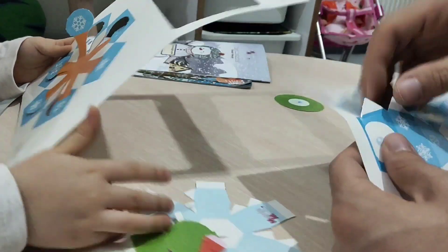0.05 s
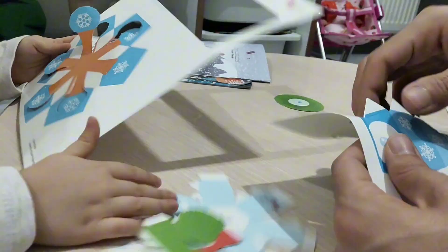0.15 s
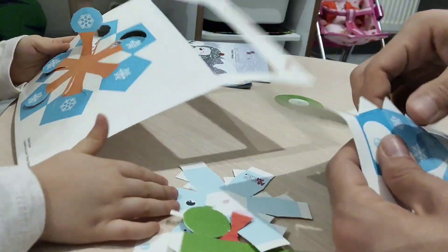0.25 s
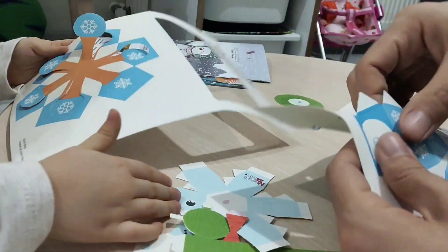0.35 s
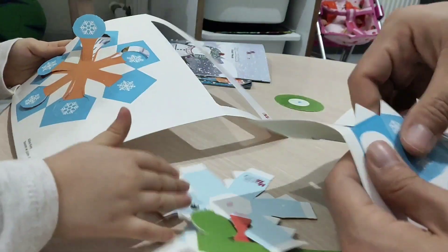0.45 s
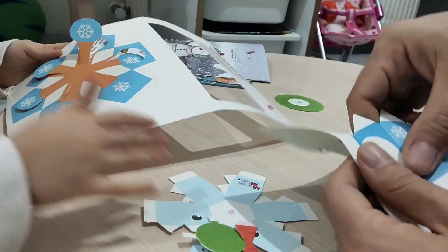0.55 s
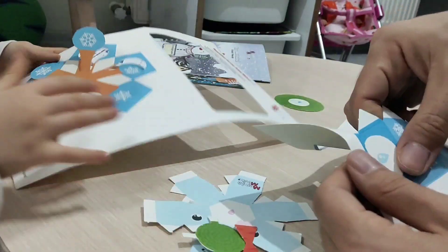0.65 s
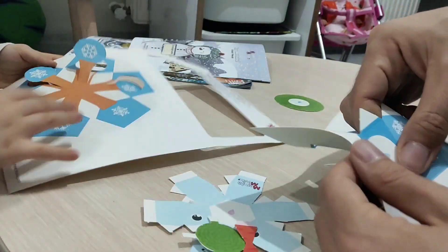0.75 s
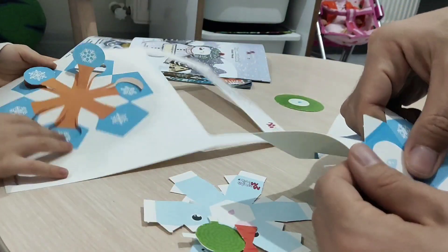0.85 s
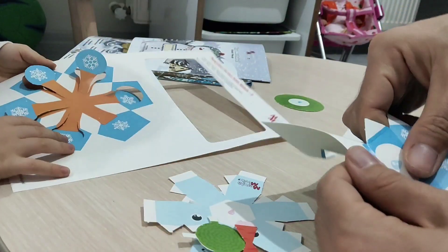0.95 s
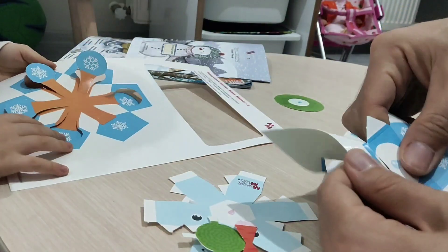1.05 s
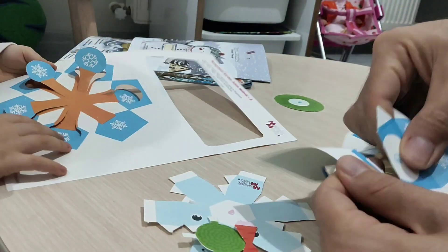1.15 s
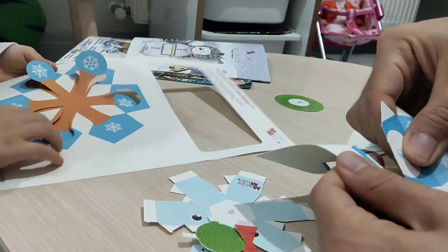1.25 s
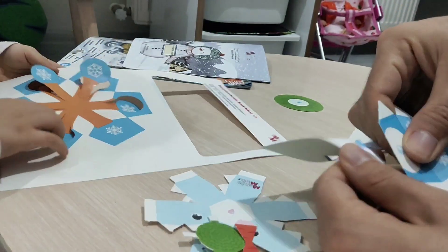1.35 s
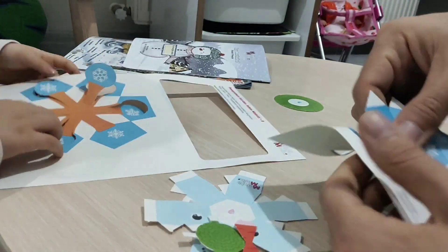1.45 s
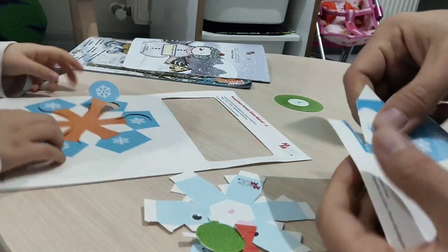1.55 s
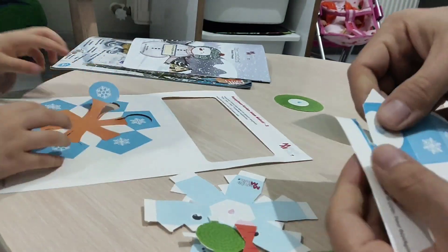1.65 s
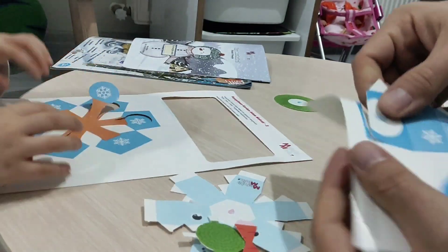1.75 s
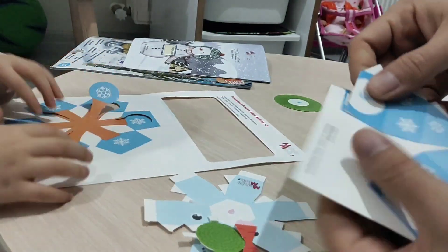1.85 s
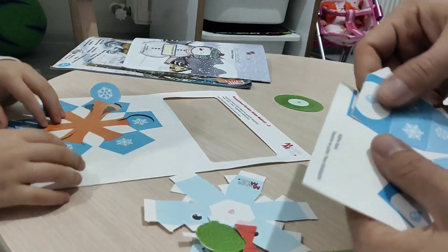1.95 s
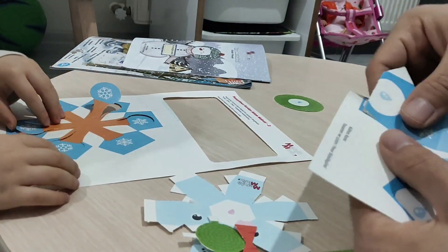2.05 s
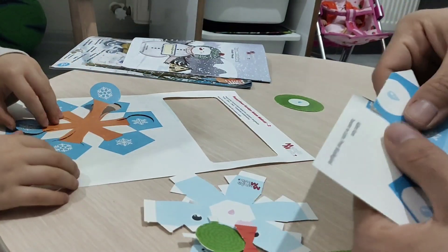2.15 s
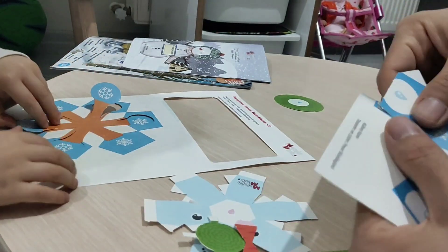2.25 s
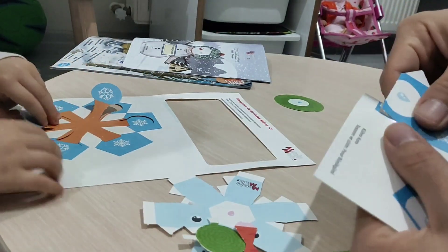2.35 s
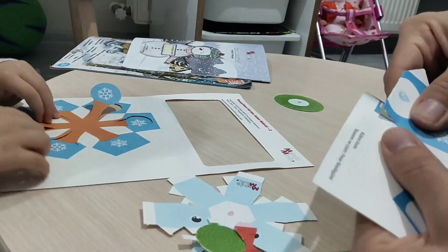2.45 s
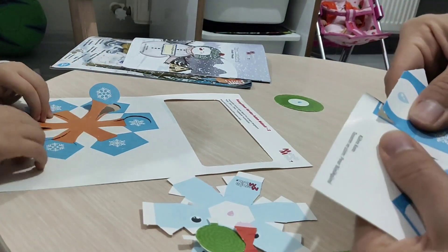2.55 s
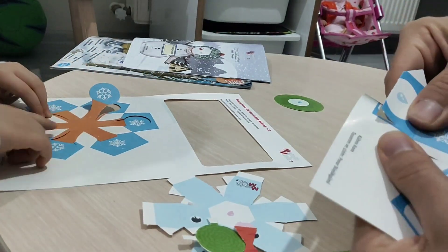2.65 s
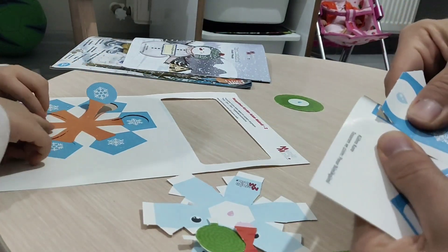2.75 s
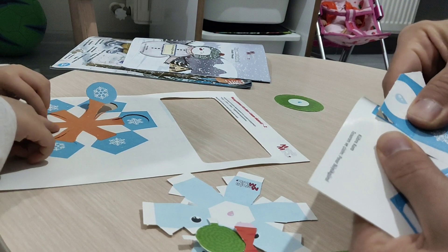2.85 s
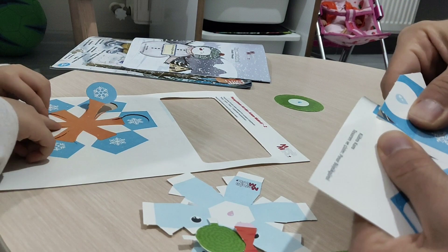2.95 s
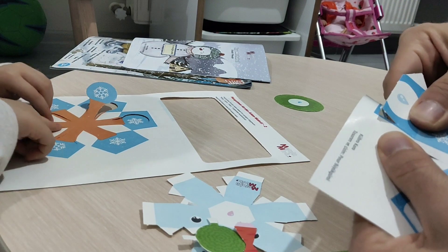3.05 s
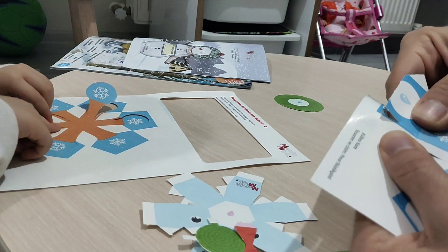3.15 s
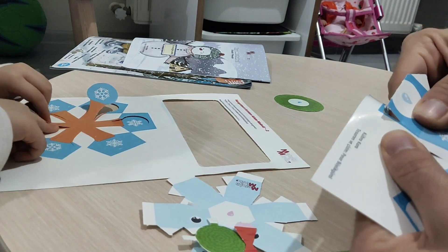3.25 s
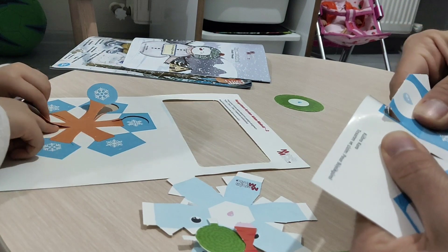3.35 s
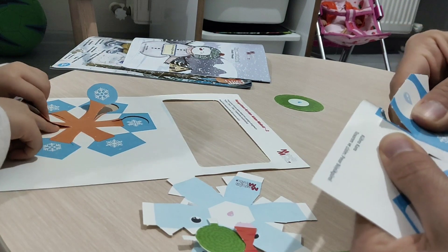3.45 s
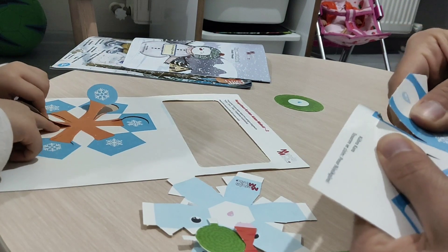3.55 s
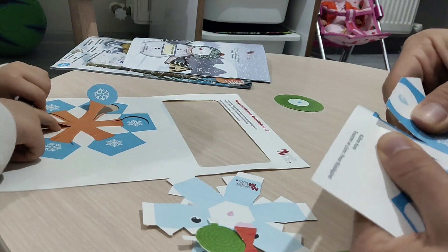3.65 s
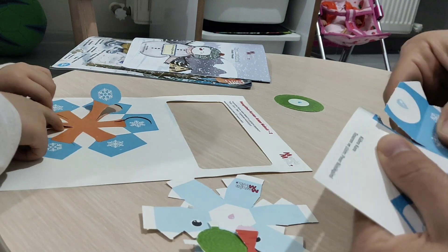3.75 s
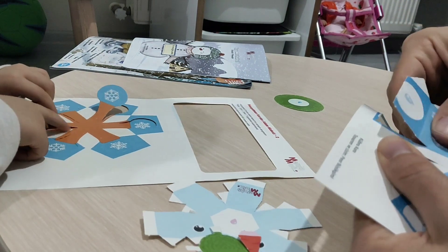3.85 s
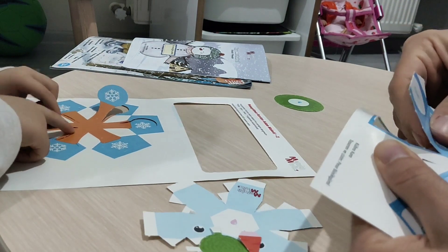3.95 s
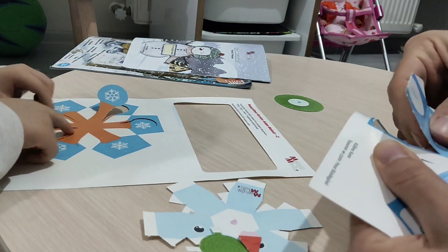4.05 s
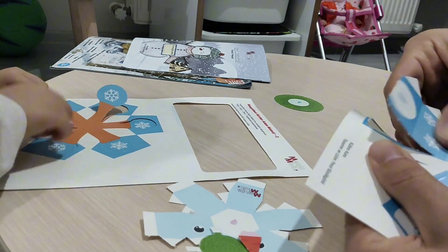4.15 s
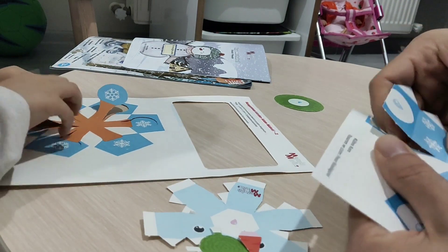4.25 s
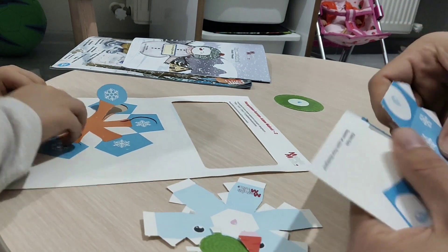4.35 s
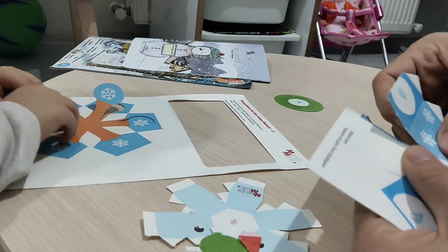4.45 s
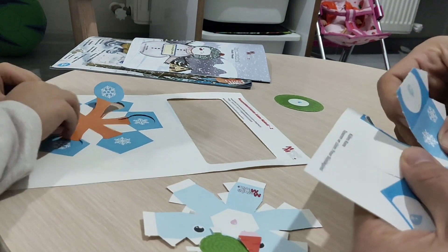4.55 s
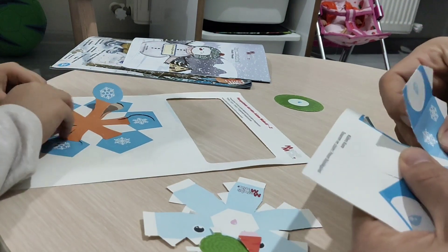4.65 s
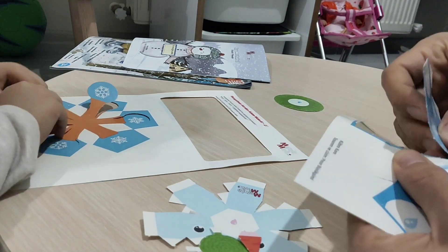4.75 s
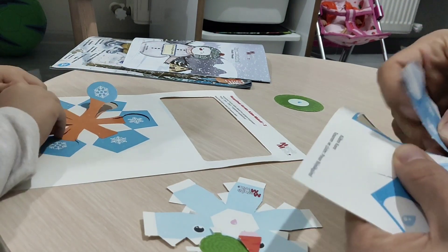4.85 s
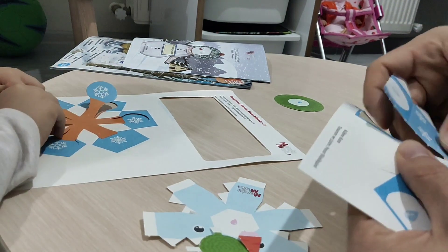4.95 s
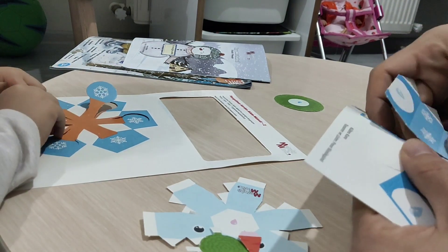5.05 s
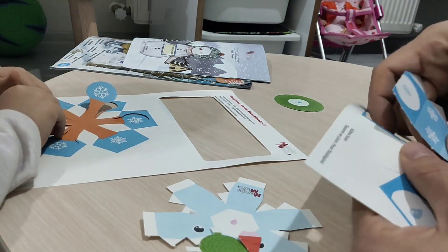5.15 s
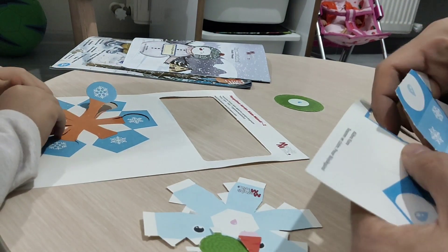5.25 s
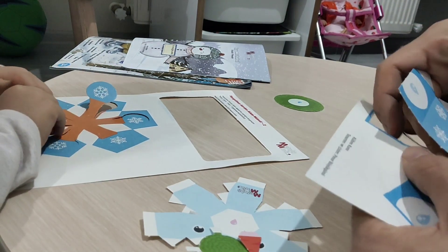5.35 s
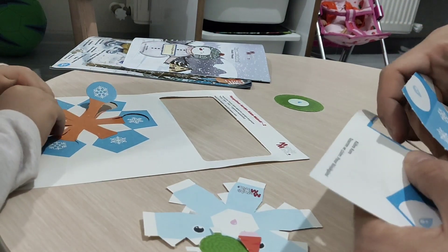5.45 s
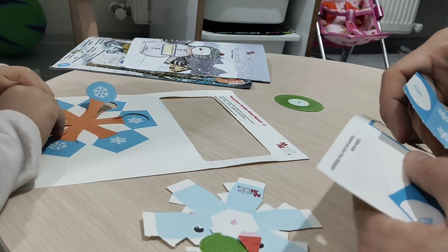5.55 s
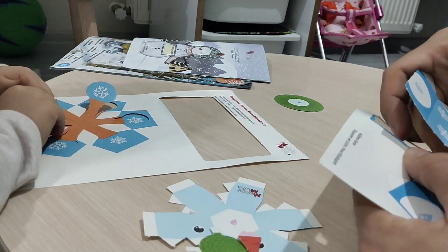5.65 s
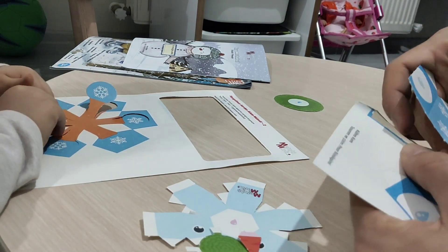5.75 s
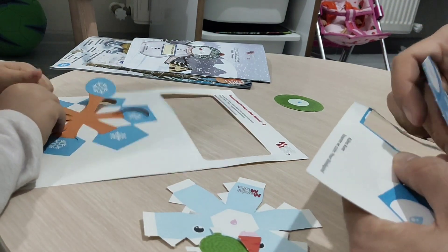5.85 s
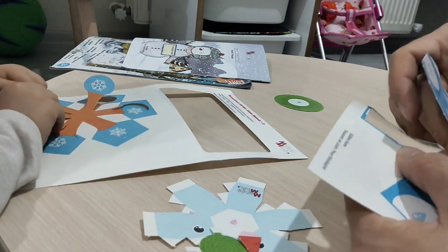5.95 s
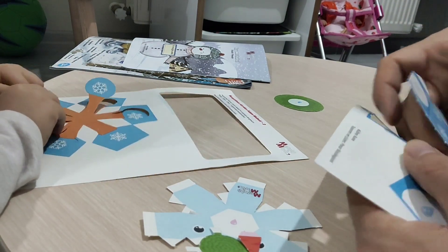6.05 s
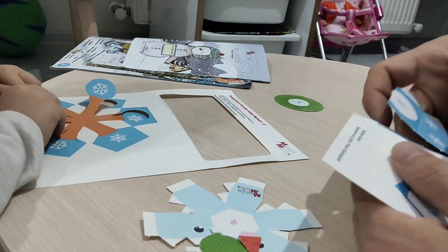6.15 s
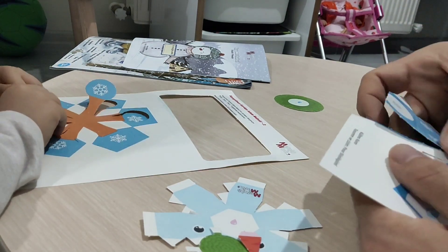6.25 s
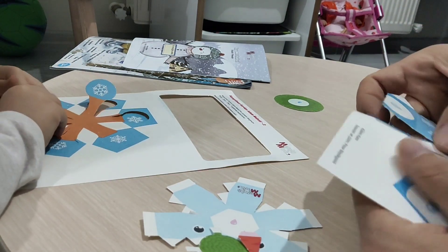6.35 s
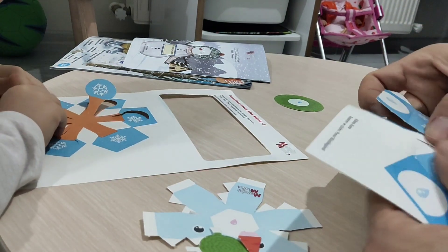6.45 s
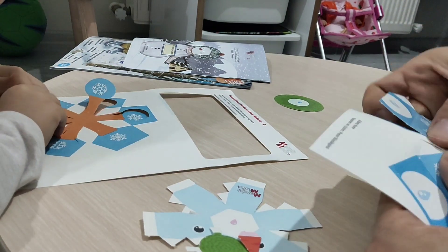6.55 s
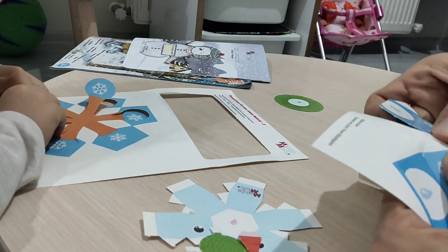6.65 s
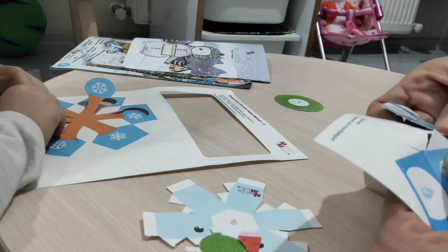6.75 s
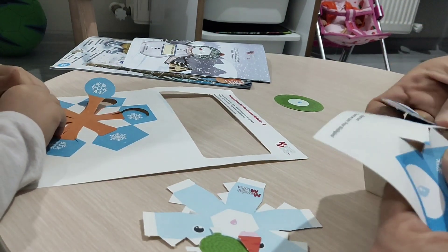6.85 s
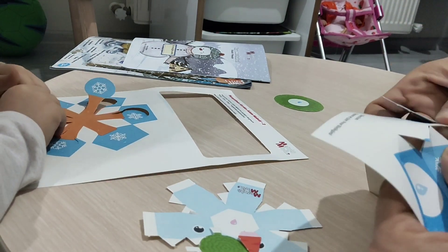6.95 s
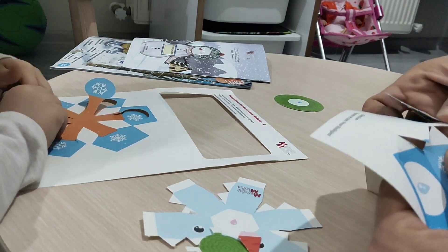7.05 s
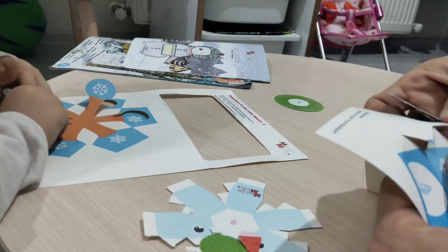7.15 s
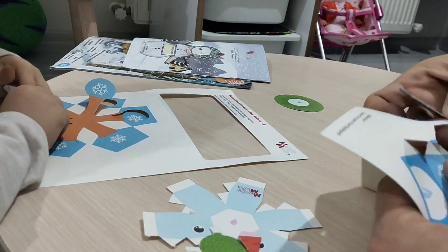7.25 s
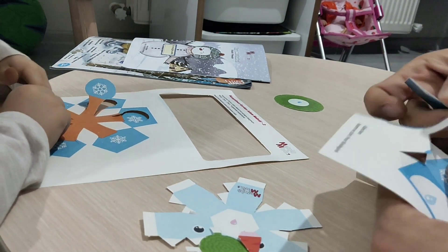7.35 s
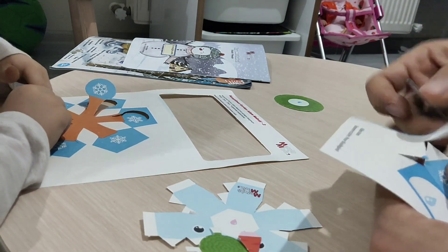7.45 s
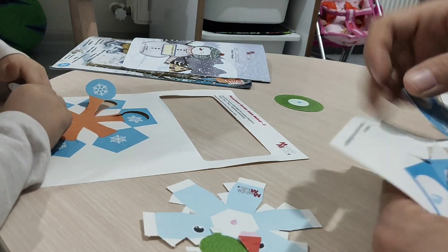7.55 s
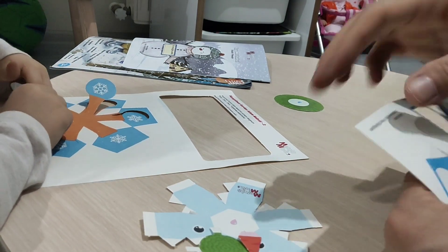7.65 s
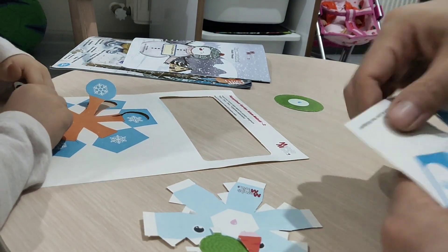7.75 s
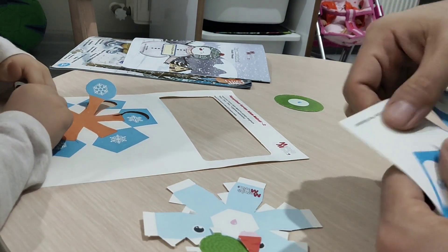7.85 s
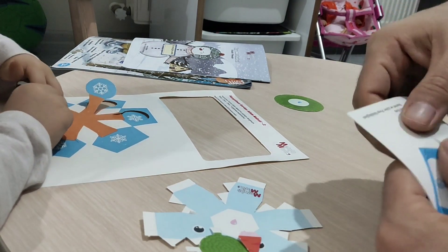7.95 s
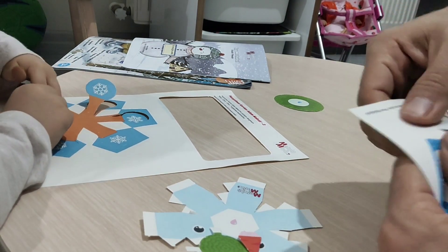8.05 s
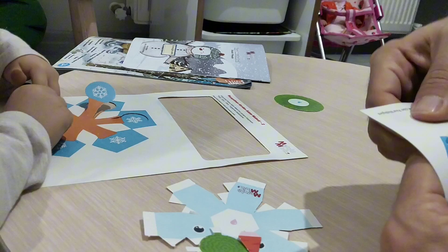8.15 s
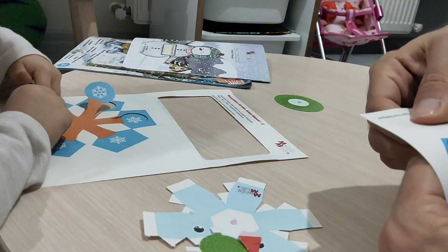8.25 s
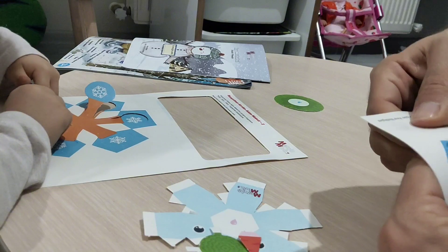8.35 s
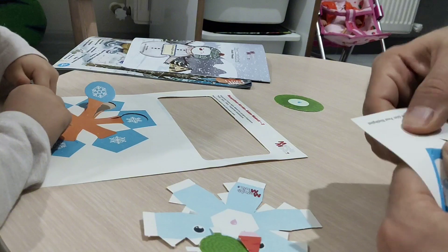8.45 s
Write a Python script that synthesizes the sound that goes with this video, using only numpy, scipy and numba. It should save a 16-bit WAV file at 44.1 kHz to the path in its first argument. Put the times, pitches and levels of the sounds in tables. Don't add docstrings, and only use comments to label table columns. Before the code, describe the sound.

Stiff paper handling at a table, recorded close in stereo. Card flexes and crinkles in short bursts, faces slide with a dry hiss, corners flick and creases tick. Bridges between die-cut pieces break with hard, woody pops, irregularly spaced, some near full level. There are low hand knocks, fine scrapes and one tiny finger squeak, with a brief indoor echo and an almost silent background.

```python
import sys
import numpy as np
from scipy import signal
from scipy.fft import rfft, irfft
from scipy.io import wavfile
from numba import njit

SR = 44100
rng = np.random.default_rng(int(sys.argv[2]) if len(sys.argv) > 2 else 0)


def to_wav(s):
    ch = np.atleast_2d(s).T
    pcm = np.round(np.clip(ch, -1, 1) * 32767)
    wavfile.write(sys.argv[1], SR, pcm.astype(np.int16))


def volts_from_decibels(level):
    exponent = np.asarray(level, float) / 20
    return 10 ** exponent


N = 374409


def unit(x):
    return x / np.sqrt(np.mean(x ** 2, axis=-1, keepdims=True))


def colour(x, curve):
    hz, db = np.transpose(curve)
    f = np.fft.rfftfreq(x.shape[-1], 1 / SR) + 1
    return unit(irfft(rfft(x) * volts_from_decibels(np.interp(np.log(f), np.log(hz), db)), x.shape[-1]))


def ring(x, hz, width):
    return signal.lfilter(*signal.iirpeak(hz, hz / width, fs=SR), x)


def band(x, lo_hz, hi_hz):
    return signal.sosfilt(signal.butter(2, [lo_hz, hi_hz], "bandpass", fs=SR, output="sos"), x)


@njit
def glide(x, hz, sharp):
    y, b, l = np.empty(len(x)), 0., 0.
    for i in range(len(x)):
        g = np.tan(np.pi * hz[i] / SR)
        v = (b + g * (x[i] - l)) / (1 + g * (g + 1 / sharp))
        b, l, y[i] = 2 * v - b, l + 2 * g * v, v / sharp
    return y


def hump(f, hz, sharp):
    return 1 / (1 + (sharp * (f / hz - hz / f)) ** 2)


def causal(power):
    cep = irfft(np.log(power) / 2)
    half = len(cep) // 2
    cep[1:half] *= 2
    cep[half + 1:] = 0
    return np.exp(rfft(cep))


def crackles(rate, scatter_db, tail_ms):
    sizes = volts_from_decibels(scatter_db * np.minimum(rng.exponential(size=N), 4.5))
    clicks = (rng.random(N) < rate / SR) * sizes
    fade = np.exp(-1000 / (tail_ms * SR))
    return unit(signal.lfilter([1], [1, -fade], clicks))


def place(x, pan_db, apart, lag=5):
    near, other = x
    right = np.roll(np.sqrt(1 - apart) * near + np.sqrt(apart) * other, lag)
    return np.array([near * volts_from_decibels(pan_db / 2), right * volts_from_decibels(-pan_db / 2)])


def room_air():
    # frequency in Hz, level in dB per Hz.
    air_curve = [(18, -46.5), (30, -20), (70, -9.5), (185, -10.5), (267, -10), (448, -15.5), (794, -16),
                 (859, -19), (1340, -19.5), (2630, -22.5), (6040, -27.5), (12200, -34), (13900, -25.5),
                 (15000, -47.5)]
    return place(colour(rng.standard_normal((2, N)), air_curve), 2.5, 0.992) * volts_from_decibels(-63)


def moves():
    # letting go in seconds, length in seconds, flexing in dB, sliding in dB re flexing.
    pulls = [(0.074, 0.089, -50, -4.5), (0.327, 0.15, -44.5, -4.5), (0.515, 0.13, -49.5, -3.5),
             (0.706, 0.076, -45, -5), (0.989, 0.045, -49, -5.5), (1.148, 0.11, -47.5, -10.5),
             (1.375, 0.12, -43, -22), (1.612, 0.2, -46, -4), (3.287, 0.15, -61, -7.5),
             (3.491, 0.032, -55, -9.5), (4.009, 0.065, -47, -1), (4.166, 0.078, -46.5, -8),
             (4.925, 0.12, -53, -0.5), (5.215, 0.125, -48.5, -1.5), (5.615, 0.052, -41.5, -9),
             (5.755, 0.0377, -44.5, -13.5), (6.107, 0.075, -47, -11), (7.39, 0.13, -40.5, -10),
             (7.535, 0.05996, -44.5, -5), (7.605, 0.037, -36.5, -6.5), (7.958, 0.05, -44, 0.5),
             (8.166, 0.048, -57, -8.5), (8.477, 0.045, -67, 3)]
    # start in seconds, length in seconds, flexing in dB, sliding in dB re flexing.
    slides = [(0.223, 0.12, -54, 4.5), (0.521, 0.082, -45.5, -3), (0.737, 0.21, -52, -7),
              (1.278, 0.194, -55, -1.5), (1.615, 0.044, -46, 0.5), (1.754, 0.18, -44, -7.5),
              (1.982, 0.14, -44.5, -8.5), (2.294, 0.18, -61, -9), (2.399, 0.43, -56.5, -7),
              (2.88, 0.1944, -62.5, -26), (3.367, 0.085, -60.5, -17.5), (3.761, 0.02, -44.5, -7.5),
              (3.87, 0.15, -53.5, 2), (4.188, 0.18, -52, -3.5), (4.389, 0.086, -45, -6.5),
              (4.5, 0.017, -42.5, -1), (4.572, 0.12, -49, -15), (4.83, 0.126, -47, -12),
              (4.972, 0.095, -44.5, -12.5), (5.101, 0.1455, -42.5, -17), (5.232, 0.13, -50.5, -3),
              (5.442, 0.0376, -47.5, -14), (5.739, 0.0675, -54.5, -22.5), (5.978, 0.1099, -57.5, -3.5),
              (6.34, 0.394, -56, -6.5), (6.658, 0.042, -47, -25), (7.026, 0.12, -47, -13),
              (7.21, 0.059, -46.5, -11.5), (7.698, 0.504, -52, -4), (7.965, 0.038, -45, -5.5),
              (8.156, 0.055, -54.5, -3)]
    pull_gain_db, slide_loss_db = 14, 11
    grip_s, let_go_s = 0.0057, 0.024
    t, power = np.arange(N) / SR, np.zeros((2, N))
    rows = [(s - length, length, db, slide_db, pull_gain_db, 1) for s, length, db, slide_db in pulls]
    rows += [(s, length, db, slide_db, -slide_loss_db, 0) for s, length, db, slide_db in slides]
    for s, length, db, slide_db, slope_db, loudest in rows:
        touch = np.clip((t - s) / grip_s, 0, 1) * np.clip(1 - (t - s - length) / let_go_s, 0, 1)
        progress = np.clip((t - s) / length, 0, 1)
        gain = touch * volts_from_decibels(db + slope_db * (progress - loudest))
        power += (gain * volts_from_decibels(np.array([[0], [slide_db]]))) ** 2
    return np.sqrt(power)


def rustle():
    # frequency in Hz, level in dB per Hz.
    flex_curve = [(180, -18.5), (300, -5.5), (469, -11), (907, 0.5), (1220, -8.5), (1620, -9.5),
                  (2000, -11), (4660, -17.5), (5000, -18), (6500, -53), (11000, -120)]
    # frequency in Hz, level in dB per Hz.
    hiss_curve = [(1180, -31), (2000, 1), (2160, -2.5), (3050, -3.5), (4730, -10.5), (6510, -15),
                  (7970, -10.5), (11700, -19.5), (13700, -9.5), (14600, -20), (15000, -61)]
    grains = crackles(600, 3.3, .9)
    depth_db = np.array([[1.5], [1], [1.6], [1.2]])
    flex_surge, hiss_surge, flex_bend, hiss_bend = volts_from_decibels(depth_db * unit(band(rng.standard_normal((4, N)), 4, 30)))
    flex = colour(rng.standard_normal((2, N)) * (.6 + grains) * flex_surge, flex_curve)
    flex = unit(flex + np.array([glide(x, 1500 * flex_bend, 6.8) for x in flex]))
    hiss = colour(rng.standard_normal((2, N)) * (1.6 + grains) * hiss_surge, hiss_curve)
    hiss_hz = np.minimum(4800 * hiss_bend, .4 * SR)
    hiss = unit(hiss + 1.9 * np.array([glide(x, hiss_hz, 3.9) for x in hiss]))
    flex_gain, hiss_gain = moves()
    return place(flex, 2.7, 0.62) * flex_gain + place(hiss, 0.67, 1.0) * hiss_gain * volts_from_decibels(5.0)


def snap(noise, db, hz, rasp_db, crack_db, thud_db, tear_ms, sharp, edge_hz, edge_db, even):
    table_echo_ms, table_echo = 2.3, 0.3
    alike_hz = 1180
    size = noise.shape[-1]
    t = np.arange(size) / SR * 1000
    f = np.fft.rfftfreq(size, 1 / SR) + 1
    burst = noise * (1 - np.exp(-t / 0.7)) * np.exp(-t / tear_ms)
    uneven = np.array([causal(np.abs(rfft(b)) ** 2 + 1e-3) for b in burst])
    burst = irfft(rfft(burst) / uneven ** even, size)
    burst = burst + table_echo * np.roll(burst, int(table_echo_ms * SR / 1000), axis=1)
    power = hump(f, hz, sharp) * hump(f, hz, 0.44)
    power += volts_from_decibels(2 * (rasp_db - 11.0)) * hump(f, 2000, 0.61) ** 2
    power += volts_from_decibels(2 * (crack_db - 20.5)) * hump(f, 10500, 0.19) ** 2
    power += volts_from_decibels(2 * (crack_db - 17)) * hump(f, 20000, 5.2) ** 2
    power += volts_from_decibels(2 * -14) * hump(f, 710, 1.3) ** 2
    power += volts_from_decibels(2 * edge_db) * hump(f, edge_hz, 3.6) ** 2
    card = unit(irfft(rfft(np.vstack([burst, t == 0])) * causal(power + 1e-9), size))
    card[1] = irfft(rfft(card[1]) * f / (f + alike_hz), size)
    thud = band(band(t * np.exp(-t / 0.51), 156.5, 550), 56, 900)
    thud = thud / np.abs(thud).max() * np.array([[1], [0], [1]])
    return volts_from_decibels(db) * (card / np.abs(card[:2]).max() + volts_from_decibels(thud_db + 8.5) * thud)


def breaks():
    # start in seconds, peak in dB, card ring in Hz, fibre rasp in dB, crack in dB.
    snaps = [(0.07, -13, 1515, -6, -19.5), (0.076, -17, 805, -3, -22.5), (1.1536, -8.5, 2300, 5, -29.5),
             (1.1906, -0.5, 846, 6, -21.5), (3.5041, -1.5, 1996, -0.5, -11), (3.563, -5, 822, 5.5, -19.5),
             (3.976, -5.5, 810, -0.5, -2.5), (4.738, -0.5, 817, 0.5, -12), (5.854, -6.5, 1480, -9.5, -15.5),
             (6.777, -2, 844, 9, -13), (6.9135, -4, 810, -1, -30), (7.601, -16, 906, -8.5, -3.5),
             (7.603, -16, 1473, 2.5, -3), (7.607, -7.5, 862, 3, -30), (7.947, -26, 277, -11, -17.5)]
    snap_edge_hz = [3500, 3000, 4300, 4350, 4200, 8830, 4790, 4660, 4460, 8200, 4830, 8200, 4700, 4710,
                    3500]
    snap_edge_db = [-18, -24, -15, -10, -10, -19, -15, -19.5, -24, -13.5, -19.5, -14, -17.5, -19.5, -18]
    snap_lag = [4, 4, 5, 3, 3, 5, 6, 7, 8, 5, 3, 6, 6, 6, 5]
    snap_thud_db = [-35.5, -37, -41.5, -37.5, -36.5, -44, -30.5, -30, -31, -33.5, -49.5, -39.5, -41, -36,
                    -38.5]
    snap_sharp = [2, 2.3, 1.2, 2.5, 2, 4.7, 1.5, 5.2, 1, 2.7, 3.5, 2.2, 2.2, 1.9, 2.6]
    # start in seconds, peak in dB, card ring in Hz, crack in dB.
    taps = [(0.599, -36, 920, -22), (0.993, -36, 936.2, -24), (1.916, -32, 1520, -23),
            (1.995, -35.5, 735, -20), (2.435, -42, 946, -11), (2.598, -36, 704, -11.5),
            (2.751, -35, 850, -1.5), (2.909, -36.5, 643, -25), (3.287, -44, 725, -20),
            (3.753, -37.5, 850, -3.5), (3.927, -35.5, 1046, -4.5), (4.122, -35.5, 598.8, -19.5),
            (4.273, -30, 812.7, -34), (5.208, -28.5, 940, 12.5), (5.353, -32.5, 842, -17),
            (5.374, -37, 647, -15), (5.457, -26.5, 880, -14.5), (6.51, -30, 873, -7),
            (6.669, -40.5, 864, -19), (7.044, -32.5, 743.4, -12.5), (7.066, -39, 949, -18),
            (7.105, -33, 755.7, -14.5), (7.529, -34.5, 902, -21), (7.735, -26, 406, -18.5),
            (8.136, -28, 820, -8)]
    # start in seconds, peak in dB, crack in dB.
    crease_rows = [(0.311, -19.5, -8), (0.525, -21, -10), (2.003, -31.5, -21.5), (2.809, -37.5, -11),
                   (2.882, -38, -26.5), (3.267, -34.5, -11.5), (4.38, -32, -11.5), (4.508, -22, 2),
                   (4.657, -31, -7.5), (4.981, -29, -18), (5.281, -29.5, -24.5), (5.568, -33.5, -10.5),
                   (5.593, -28.5, -22), (5.61, -47, -12.5), (5.623, -45, -16), (5.667, -38.5, -17),
                   (5.704, -39.5, -26.5), (5.985, -34.5, -10.5), (6.343, -35, -27), (6.736, -42, -22),
                   (6.765, -43, -4), (7.151, -36, -21), (7.215, -33.5, -9), (7.346, -26.5, -9.5),
                   (7.664, -18, -20.5), (8.25, -39.5, -1)]
    # start in seconds, peak in dB, ring in Hz, crack in dB.
    flicks = [(0.23, -35, 1760, -10), (0.509, -22, 2200, -12), (0.659, -33, 2300, -13.5),
              (0.707, -26.5, 1057, -40.5), (0.928, -33, 4440, -8), (1.751, -41, 2500, -10),
              (1.766, -29, 2670, -28), (3.308, -32.5, 1070, -8.5), (3.845, -40, 4140, -17.5),
              (3.872, -40.5, 3230, -8.5), (3.889, -30, 4089, 12), (5.108, -52, 1131, -19),
              (5.446, -28, 2240, -8), (7.411, -24.5, 1344, -28), (7.786, -37, 1162, -21),
              (7.849, -28, 2160, -10), (7.936, -33, 3300, -16), (8.192, -30.5, 5200, -22.5)]
    # start in seconds, peak in dB.
    speck_rows = [(2.685, -51.5), (2.832, -46), (2.959, -44), (2.988, -49), (3.088, -52), (3.199, -42.5),
                  (3.241, -48), (3.33, -54), (3.372, -48.5), (3.39, -43.5), (3.414, -48), (3.437, -48),
                  (8.286, -45)]
    # start in seconds, peak in dB, ring in Hz, crack in dB.
    ticks = [(0.44, -37, 2120, -15), (0.87, -46, 630, -12), (0.922, -37, 4300, -17), (0.97, -40, 1790, -8),
             (1.425, -34.5, 860, -17), (1.461, -32.5, 900, -19), (1.986, -41, 826, -20.5),
             (2.455, -52, 902, -14), (2.486, -55, 1000, -15), (2.557, -44, 770, -15),
             (2.605, -45, 721, -12), (2.611, -59, 746, -14), (2.62, -45, 719, -13),
             (2.629, -50.5, 762, -12), (2.644, -45, 845, -13), (2.733, -52, 799, -13),
             (2.774, -48.5, 1630, -15.5), (3.812, -48.5, 939, -15), (4.101, -51, 716, -15),
             (4.177, -46, 834, -15), (4.393, -34, 885, -15), (4.624, -36, 1123, -15),
             (4.71, -38.5, 840, -15), (5.539, -39, 816, -17.5), (5.654, -46.5, 907, -15),
             (5.684, -40, 890, -11), (5.72, -36.5, 856, -16.5), (5.959, -45, 876, -13.5),
             (6.004, -44, 842, -17), (6.107, -37.5, 766, -15), (7.297, -35, 915, -13),
             (7.538, -25, 2680, -18), (7.802, -26.5, 1200, -7), (7.915, -36, 3440, -20),
             (8.096, -35.5, 926, -15.5), (8.18, -33.5, 918, -16)]
    # start in seconds, peak in dB, ring in Hz, crack in dB.
    leads = [
        (0.294, -30, 3500, -15),
        (3.502, -17, 1810, -17.5),
        (6.775, -21.5, 1010, -16),
        (7.575, -31.5, 900, -17),
    ]
    size = 2048
    out = np.zeros((3, N + size))
    per_snap = zip(snaps, snap_edge_hz, snap_edge_db, snap_lag, snap_thud_db, snap_sharp)
    for (s, db, *tone), edge_hz, edge_db, lag, thud_db, sharp in per_snap:
        one = snap(rng.standard_normal((2, size)), db, *tone, thud_db - db, tear_ms=1.26, sharp=sharp,
                   edge_hz=edge_hz, edge_db=edge_db, even=.7)
        out[:, int(s * SR):][:, :size] += np.vstack([place(one[:2], 0.68, 0.73, lag), one[2]])

    creases = [(s, db, 800 * (1 + 0.057 * rng.standard_normal()), crack_db) for s, db, crack_db in crease_rows]
    specks = [(s, db, 3820, -1) for s, db in speck_rows]
    small = list(creases) + list(flicks) + specks + list(ticks) + list(leads)
    for rows, thud_db in ((taps, -17), (small, -30)):
        for s, db, hz, crack_db in rows:
            one = snap(rng.standard_normal((2, size)), db, hz, 0.78, crack_db, thud_db, tear_ms=2.5,
                       sharp=3.5, edge_hz=4600, edge_db=-25, even=.3)
            out[:, int(s * SR):][:, :size] += np.vstack([place(one[:2], 1.6, 0.91), one[2]])
    return out[:2, :N], out[2, :N]


def room(x):
    # band centre in Hz, t60 in seconds, level in dB.
    decay_bands = [(100, 0.71, -2.5), (407, 0.23, 6), (760, 0.26, -3.5), (1580, 0.21, 2),
                   (2550, 0.26, -10.5), (4960, 0.24, -13), (8060, 0.242, 3.5), (12000, 0.21, -5.5)]
    # frequency in Hz, width in Hz, boost in dB.
    table_modes = [(830, 220, 4.5), (2600, 300, 7), (640, 60, 4)]
    first_wall_s = .013
    slap_s, slap_db = .0165, -6
    t = np.arange(int(.6 * SR)) / SR
    flutter = sum(np.exp(-((t - k * slap_s) / .0013) ** 2) / k for k in (1, 2, 3))
    early = 1.8 * np.exp(-t / 0.0046)
    walls = .45 * np.clip(t / first_wall_s, 0, 1) ** 4
    arrive = 1.2 + early + walls + volts_from_decibels(slap_db) * flutter
    slaps = 2.4 + crackles(500, 2.5, 1.5)[:len(t)]
    noise = rng.standard_normal((len(decay_bands), 3, len(t))) * slaps
    tail = sum(volts_from_decibels(db - 60 * t / t60) * ring(n, hz, 0.86 * hz) for n, (hz, t60, db) in zip(noise, decay_bands))
    for hz, width, db in table_modes:
        tail = tail + (volts_from_decibels(db) - 1) * ring(tail, hz, width)
    tail = arrive * band(0.6 * tail[0] + tail[1:], 30, 12500)
    tail = tail / np.sqrt(np.sum(tail ** 2, axis=-1, keepdims=True))
    return volts_from_decibels(-10) * signal.fftconvolve(x[None], tail, axes=1)[:, :N]


def table():
    # peak in seconds, time to die 10 dB in seconds (negative: swells instead), level in dB, thrum in Hz.
    jolts = [(.1, 0.08, -41.5, 275), (.24, 0.06, -55.5, 172), (.67, 0.28, -55, 140),
             (1.22, 0.13, -46, 157.3), (1.4, 0.3, -62.5, 133.2), (1.84, 0.25, -53, 170.7),
             (2.44, 0.2, -54.5, 178), (2.9, 0.2, -61, 135), (3.5, -0.2, -63.5, 167.2),
             (3.99, 0.137, -54, 225), (4.17, -0.41, -60, 228), (4.3, -0.4, -61.5, 133),
             (4.775, -0.06, -44, 210.3), (5.19, -0.2, -46, 125), (5.32, -0.7, -55, 91),
             (5.875, -0.16, -45, 248), (6.12, -0.2, -59.5, 169), (6.52, 0.23, -55.5, 190),
             (7.1, 0.34, -55, 202), (7.36, 0.27, -51, 267), (7.62, 0.096, -40.5, 200),
             (7.955, 0.12, -48, 266), (8.1, 0.5, -58.5, 200.6)]
    # frequency in Hz, level in dB per Hz.
    rumble_curve = [(15, -64), (25, -46.5), (58, 8), (97, -2.5), (177, -14.5), (299, -13.5), (500, -15),
                    (650, -39), (1100, -120)]
    rise_share = 0.57
    t = np.arange(N) / SR
    s, _, _, hz = np.transpose(jolts)
    noise = colour(rng.standard_normal((2, N)), rumble_curve)
    thrum = unit(np.array([glide(x, np.interp(t, s, hz), 2.9) for x in noise]))
    gain = 0
    for at, fall, db, _ in jolts:
        gain = gain + volts_from_decibels(db - 10 * np.maximum((t - at) / fall, (at - t) / (rise_share * fall)))
    waver_db = 2.0 * unit(band(rng.standard_normal(N), 1.6, 9))
    return place(thrum, 4.1, 0.84) * gain * volts_from_decibels(-5.0 + waver_db)


def scrape():
    drag_s = [.195, .226, .78, .965, 1.53, 1.54, 1.775, 1.92, 2.045, 2.391, 2.392, 2.424, 2.495, 2.595,
              2.748, 2.751, 3.003, 3.252, 3.515, 3.572, 4.116, 4.12, 4.12, 4.14, 4.845, 4.86, 5.103, 5.444,
              5.61, 6.785, 6.815, 7.38, 7.6, 7.61, 7.923, 7.925, 8.13, 8.14, 8.248]
    # length in seconds, edge resonance in Hz, level in dB, sharpness.
    drag_edge = [(.03, 8700, -50, 3), (.012, 2300, -44.5, 0.59), (0.065, 2190, -46, 0.66),
                 (0.036, 3300, -62, 1.2), (.1, 4800, -55, 8), (0.083, 1900, -45.5, 2.1),
                 (0.068, 2090, -42.5, 0.84), (0.023, 10000, -61, 2.1), (0.0767, 2070, -45.5, 0.68),
                 (0.0223, 4300, -48.5, 1.6), (0.022, 6950, -55.5, 2.5), (0.0227, 973, -50, 22),
                 (0.092, 7460, -59, 5.5), (0.054, 580, -52.5, 2.23), (0.014, 4200, -49, 1.1),
                 (0.051, 7749, -65, 6), (.066, 7900, -66, 8.3), (0.035, 8100, -62, 8),
                 (0.04, 2300, -38.5, 8), (.06, 2310, -45.5, 5.4), (.15, 3300, -52, 14),
                 (0.066, 730, -47, 4), (0.023, 580, -44, 5.6), (0.057, 7040, -57.5, 7.1),
                 (0.024, 1100, -45, 8), (0.036, 1400, -51.5, 20.4), (.035, 1200, -46.5, 1.9),
                 (0.0085, 3800, -45, 4.2), (0.0202, 6900, -50.5, 2.1), (0.05, 2650, -43, 7),
                 (0.019, 790, -40.5, 2.44), (.015, 4600, -48, 6), (.012, 7400, -35.5, 4),
                 (.04, 5000, -44, 8.8), (0.016, 3450, -42, 9.3), (0.018, 2145, -46, 7.5),
                 (0.02, 3200, -40, 1), (0.048, 7900, -62.5, 9), (0.008, 7300, -54.5, 3)]
    noise, out = rng.standard_normal((2, N)), np.zeros((2, N))
    for s, (length, hz, db, sharp) in zip(drag_s, drag_edge):
        span = slice(int(s * SR), int((s + length) * SR))
        width = hz / max(sharp, .8)
        one = ring(ring(noise[:, span], hz, width), hz, 2 * width)
        swell = np.sin(np.linspace(0, np.pi, one.shape[1]))
        out[:, span] += place(unit(one), 1.5, 0.95) * volts_from_decibels(db) * swell
    return out


def knocks():
    knock_s = [7.949, 7.949, 2.003, 4.176, 4.272, 3.977, 5.855, 4.74, 5.21, 7.349, 7.962, 4.283, 6.777,
               6.11, 3.765]
    # level in dB, table mode in Hz, t60 in seconds.
    knock_ring = [(-30, 286, 0.069), (-34, 700, 0.043), (-40.5, 82, 0.12), (-38.5, 250, 0.034),
                  (-45, 264, 0.033), (-28, 230, 0.08), (-34, 271, 0.042), (-33.5, 200, 0.11),
                  (-39, 95, 0.18), (-45.5, 290, .08), (-44.5, 44.7, .15), (-50, 64, .12), (-44, 50, .06),
                  (-49, 60, .12), (-48, 65, .1)]
    t, out = np.arange(N) / SR, 0
    for s, (db, hz, t60) in zip(knock_s, knock_ring):
        age = np.maximum(t - s, 0)
        rattle = 0.43 * np.sin(2 * np.pi * 0.34 * hz * age)
        out = out + volts_from_decibels(db - 60 * age / t60) * np.sin(2 * np.pi * hz * age + rattle)
    out = band(out, 30, 3000)
    return place([out, out], 6.1, 0)


def squeak():
    hz, db = (1110, -36)
    start_s, length_s, rise_hz = 4.89, .04, 24.8
    t = np.arange(N) / SR - start_s
    swell = np.sqrt(np.abs(np.sin(np.pi * np.clip(t / length_s, 0, 1))))
    swell = swell + 0.3 * (t > 0) * np.exp(-np.abs(t - length_s) / 0.025)
    waver = 0.39 * unit(band(rng.standard_normal(N), 27.8, 138.0))
    phase = 2 * np.pi * (hz * t + rise_hz * (t / length_s - 1) * t / 2) + waver
    harmonics = ((1, 1), (2, 0.134), (3, 0.049), (4, 0.1))
    tone = sum(level * np.sin(k * phase) for k, level in harmonics)
    return volts_from_decibels(db) * swell * tone * np.ones((2, 1))


def scene():
    sheets, chirp = rustle(), squeak()
    near, around = breaks()
    echo = room(around + chirp[0] + volts_from_decibels(-3.0) * sheets[0])
    steady = table() + knocks() + room_air() + scrape()
    return near + chirp + sheets + echo + steady


def band_limit(x):
    return signal.sosfilt(signal.butter(12, 15940, fs=SR, output="sos"), x)


def record(dry):
    # resonance in Hz, width in Hz, boost in dB.
    ports = [
        [(14200, 940, 2), (6520, 550, 1)],
        [(8028, 1280, 9), (5740, 790, -4)],
    ]
    # frequency in Hz, level in dB.
    top_curve = [(100, 0), (14300, 0), (14700, -21), (16500, -18), (17000, -70)]
    out = []
    for x, port in zip(dry, ports):
        for hz, width, db in port:
            x = x + (volts_from_decibels(db) - 1) * ring(x, hz, width)
        out.append(colour(x, top_curve) * np.std(x))
    return band_limit(np.clip(out, -1, 1))


dry = scene()
out = record(dry)
to_wav(out)
```